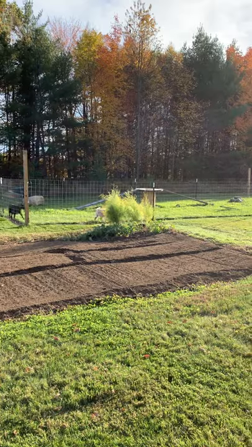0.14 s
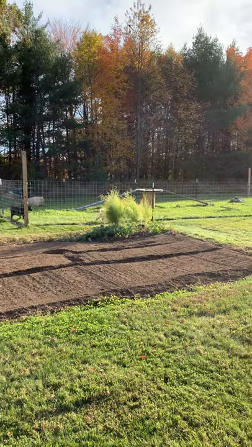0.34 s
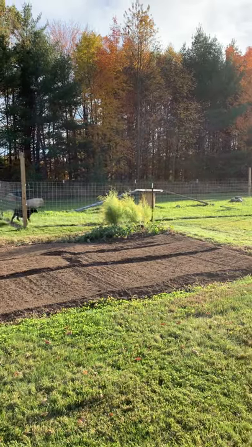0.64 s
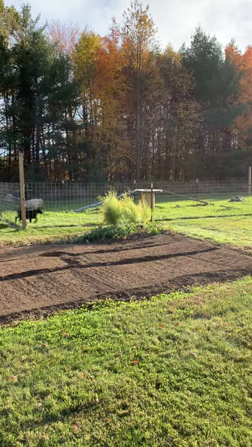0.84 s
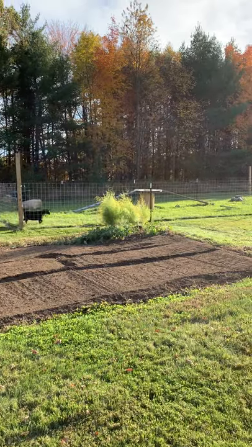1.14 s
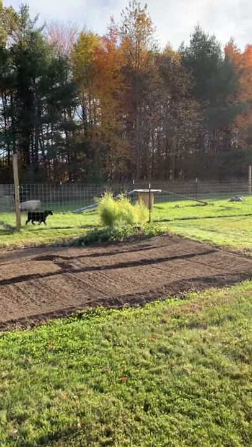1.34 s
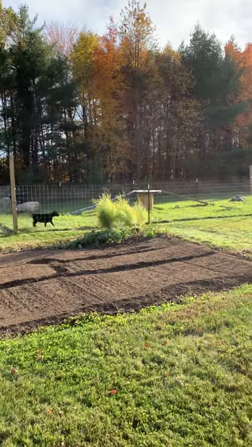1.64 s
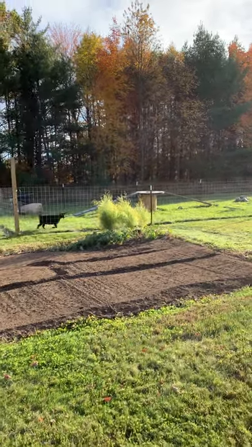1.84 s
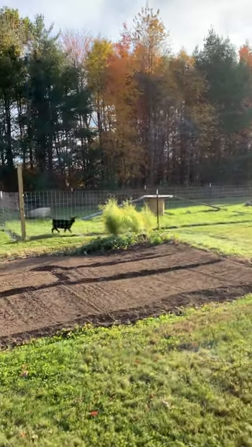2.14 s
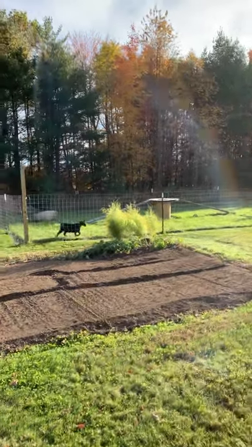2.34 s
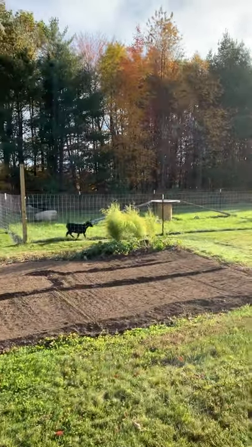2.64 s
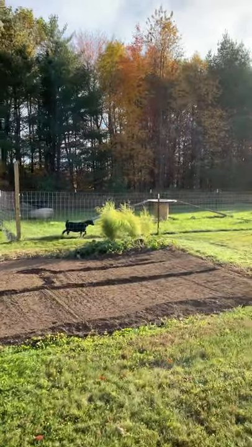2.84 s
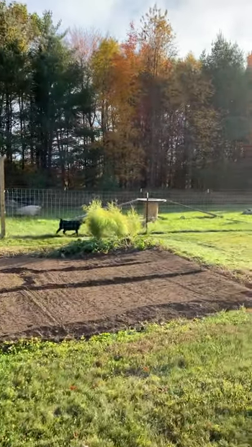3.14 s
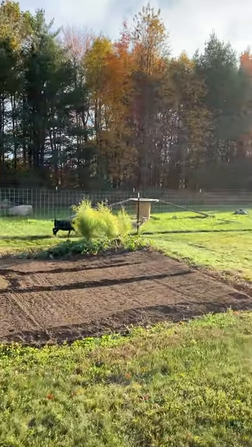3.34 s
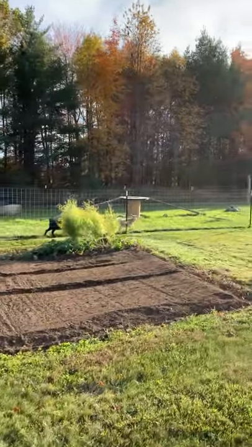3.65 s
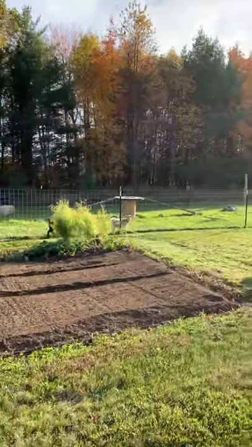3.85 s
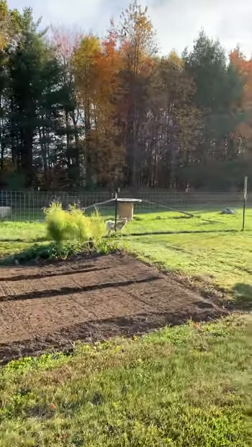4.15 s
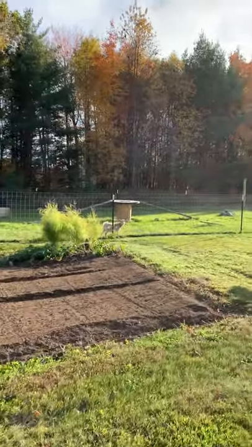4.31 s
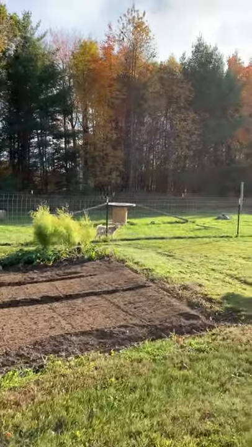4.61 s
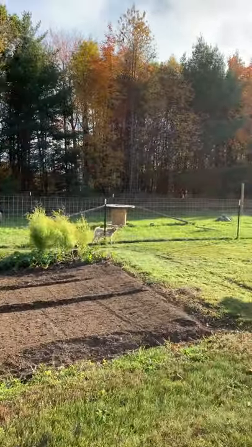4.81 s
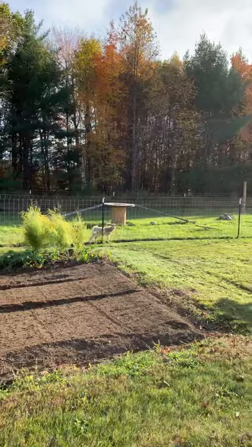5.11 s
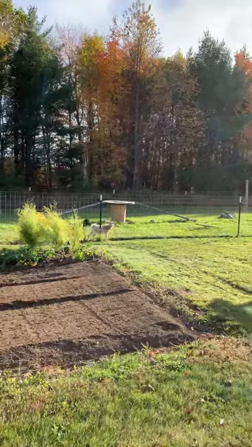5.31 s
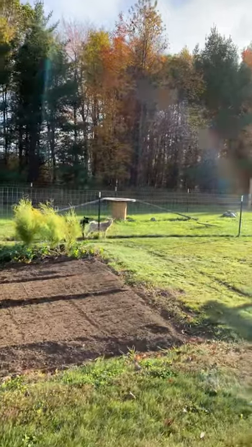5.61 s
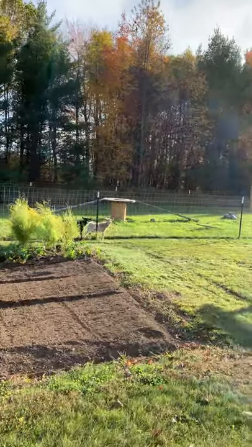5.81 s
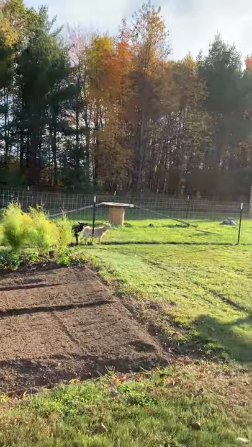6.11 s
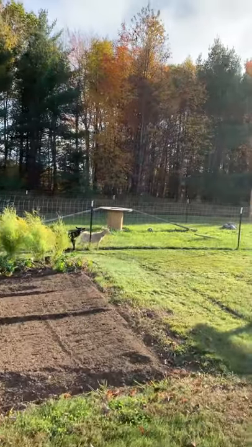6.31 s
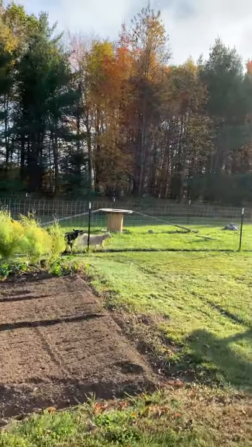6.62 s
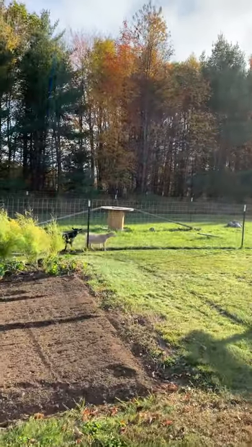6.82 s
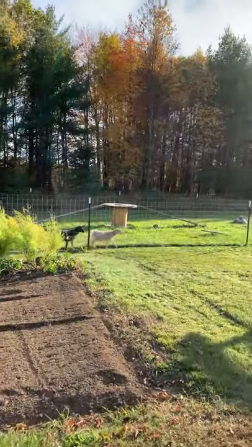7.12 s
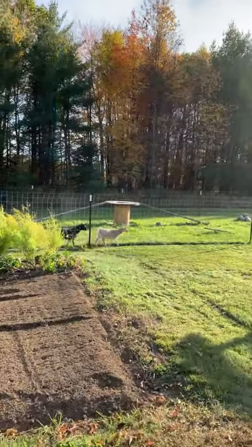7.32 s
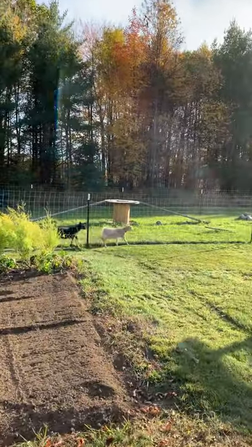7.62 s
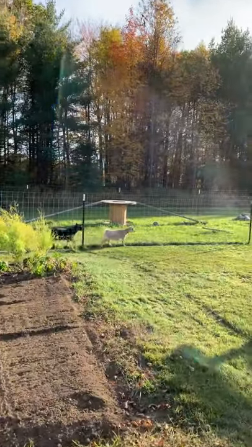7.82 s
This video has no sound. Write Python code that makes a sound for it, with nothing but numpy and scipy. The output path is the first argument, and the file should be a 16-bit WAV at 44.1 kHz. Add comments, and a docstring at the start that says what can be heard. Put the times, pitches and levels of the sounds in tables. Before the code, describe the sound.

Two young goats call at mid-distance, almost in unison, in three bursts separated by pauses of over a second. One voice is strained, sliding down and breaking; the other stutters brightly above it. Crickets trill in the gaps, growing louder, with soft rustles and brittle grass ticks close to the handheld microphone. Light open-air echo, quiet insect hiss and low distant hum.

```python
"""Two young goats bleat over each other across a pasture: one holds long cries that break into half pitch,
the other stutters. A nearby wall and a tree line send back echoes; crickets chirp, trill and buzz, insects
hiss, grass snaps and rustles near the microphone, far traffic hums. Goat voices are pulses and breath through
resonances; crickets are short gliding tones; grass, leaves, hiss and hum are shaped noise."""
import sys
import numpy as np
from scipy import signal
from scipy.fft import rfft, irfft, next_fast_len
from scipy.io import wavfile
from scipy.ndimage import uniform_filter1d, map_coordinates

SR = 44100
rng = np.random.default_rng(int(sys.argv[2]) if len(sys.argv) > 2 else 0)


def voltage_ratio(level):
    """Linear amplitude factor for a level in decibels (scalar or array-like)."""
    return 10 ** (np.asarray(level, float) / 20)


def inscribe(sig):
    """Save sig as 16-bit PCM at rate SR to the path in sys.argv[1].

    A 1-D sig is mono; a 2-D sig holds one channel per row.
    Samples are clipped to [-1, 1] before scaling.
    """
    pcm = np.round(np.clip(np.atleast_2d(sig).T, -1, 1) * 32767)
    wavfile.write(sys.argv[1], SR, pcm.astype(np.int16))


N = 351036

# long cries, course of each: t/s, pitch/Hz, relative effort/dB, upper mouth resonance f/Hz, breath (0-1),
# half pitch (0-1), second resonance level/dB, treble slope/(dB per octave)
CRY_COURSES = [
    [(0, 393, -33.5, 6600, 0.8, 0.36, -2, -5.5), (.04, 392.7, -30.5, 6600, .08, 0.3, -1.5, -7.5),
     (.09, 390.9, -35, 6600, 0, 0.42, 1, -7.5), (.165, 383, -38, 6830, 0.45, 0.65, -4, -7),
     (.19, 376.2, -38.5, 6860, 0.54, 0.4, 2, -3), (.26, 387.4, -52, 6850, 0.83, 0.2, 4, -5)],
    [(1.335, 354, -69, 4450, 0, 0, -3, 0.5), (1.36, 384, -48, 4700, .15, 0, -3, 2.5),
     (1.4, 437, -35, 5600, 0.2, 0, 0, 0), (1.44, 468.3, -31.5, 5600, .03, 0, -6, -1),
     (1.5, 457.2, -33, 5260, 0, 0.02, -3.5, 1), (1.56, 451.5, -35, 5100, 0.1, 0.02, 3, 2),
     (1.63, 431, -35, 4970, 0.21, .1, -1, 3), (1.7, 408.8, -36.5, 5013, 0.24, 0.13, 6, 1),
     (1.85, 396, -36, 6000, 0.45, 0.36, 5.5, -1), (2.0, 387.6, -38.5, 6330, 0.37, 0.66, -0.5, 3),
     (2.13, 381.8, -42, 6560, 0.41, 0.47, -5, 4), (2.22, 393, -39, 6650, 0.32, 0.25, -1.5, 4.5),
     (2.27, 382.6, -39, 6810, 0.9, 0, 4.5, 5), (2.31, 360, -88, 6500, 0.9, .3, 0, 2)],
    [(3.875, 396, -66, 5130, 0.5, 0, 0, -2), (3.915, 461.5, -35, 5700, 0.1, 0, 4, 3),
     (3.99, 483.7, -30, 5700, 0.18, 0.07, -4.5, 2.5), (4.12, 469.3, -32.5, 5320, 0.04, 0.08, 2.5, 5.5),
     (4.22, 443.6, -33.5, 5060, 0.17, 0.05, 3, 8.5), (4.32, 414, -31, 5960, 0.38, 0.13, 5, 6),
     (4.45, 408.4, -33.5, 6280, 0.4, 0.05, 6.5, 6), (4.58, 403.9, -35.5, 6600, 0.54, 0.4, 5.5, 6),
     (4.7, 388.1, -36, 7000, 0.4, 0.86, 3.5, 2.5), (4.795, 375.8, -32.5, 6800, 0.39, 0.8, 0, 1),
     (4.815, 398.8, -32, 6560, 0, 0.12, -3.5, 1.5), (4.865, 387.8, -32.5, 6700, 0.2, 0, -7, 3),
     (4.89, 385.3, -38.5, 6600, 0.6, 0.33, -3, 3), (4.92, 363, -75, 6650, 0.54, .3, 4, -3)],
    [(6.36, 392, -43, 5300, 0.4, 0.1, 2, 1), (6.41, 433.7, -31.5, 6200, 0.3, 0, -1, -0.5),
     (6.47, 457.3, -30.5, 6640, 0.15, 0.3, -4, -0.5), (6.53, 438.6, -32.5, 6400, 0.14, 0.1, -1, 0.5),
     (6.73, 411.3, -32, 7450, 0.11, 0, -1, 2), (6.9, 406, -31, 7620, 0.36, 0.31, -4, 1),
     (6.96, 401.7, -32, 7780, 0, 0, 3.5, -0.5), (7.02, 399.7, -30.5, 7990, 0.5, 0.04, -0.5, -0.5),
     (7.11, 389.3, -38, 8170, 0.36, 1, 4.5, 1), (7.2, 381.4, -35.5, 8200, 0.63, .9, -8, 0),
     (7.225, 390, -33, 8500, 0.43, .4, -1, -3.5), (7.3, 371.5, -35, 8000, 0.53, .4, -2.5, -1.5),
     (7.35, 346, -49, 8300, .9, 0.1, -1, 3)],
]
# stuttered bleats, one row a throb: t of the crest/s, crest pitch/Hz, relative effort/dB
BLEAT_THROBS = [
    [(1.588, 605.6, -46.5), (1.662, 600.8, -35.5), (1.738, 596.6, -31), (1.823, 582.3, -33.5),
     (1.907, 595.3, -30.5), (1.992, 551.7, -32.5), (2.08, 529, -30.5), (2.17, 497.5, -36),
     (2.255, 462.2, -49)],
    [(3.84, 601, -37), (3.916, 590.6, -30), (3.996, 585, -35), (4.077, 582, -35), (4.16, 557, -35.5),
     (4.245, 508, -35.5)],
    [(6.287, 569.5, -38), (6.361, 593, -31.5), (6.444, 588, -28.5), (6.521, 589, -31), (6.604, 585, -25.5),
     (6.685, 573, -30), (6.775, 535.5, -32.5), (6.865, 483.4, -32)],
]
# effort through one throb: share of the way to the next crest (0-1), level/dB
THROB_EFFORT = [(0, 1), (.06, -2), (.14, -9), (.3, -7), (.5, -13), (.68, -4), (.82, -1), (1, -1.5)]
# fixed throat resonances, each passed twice: f/Hz, width/Hz, level per pass/dB
CRY_THROAT_MODES = [(406, 110, -11.5), (1197, 289, 2), (2525, 514, -1), (4080, 877, -3), (4665, 1170, 0.5),
                    (5388, 2400, -3.5), (8980, 2000, -4), (12870, 10500, -14.5)]
BLEAT_THROAT_MODES = [(550, 340, -12.5), (1191, 208, 2), (2609, 410, -2), (3478, 530, -2.5),
                      (4460, 2020, -4.5), (6400, 1380, -2), (9450, 5000, -6)]
# decay of the tree echo: f/Hz, time to fall 60 dB/s
TREE_DECAY = [(300, 0.4), (1200, 0.93), (3000, 0.7), (9000, 0.23)]
# grass snaps: t/s, tick level/dB, knock level/dB, knock f/Hz
GRASS_SNAPS = [(2.314, -68, -59.5, 486), (2.607, -59, -60.5, 302), (3.292, -56, -50, 1370),
               (3.351, -50, -53.5, 1500), (3.376, -48, -44, 1080), (3.427, -52, -46.5, 1250),
               (3.473, -45.5, -50, 1210), (3.515, -44, -53, 1300), (4.934, -78, -48, 626),
               (5.392, -80, -53.5, 189), (5.684, -47, -64, 1014), (6.041, -61.5, -54, 1510),
               (6.079, -43, -59, 1470), (6.11, -38, -73, 1520), (6.122, -47, -68, 1500),
               (6.234, -37.5, -59, 686), (7.398, -68.5, -49, 341), (7.879, -92, -56.5, 362),
               (7.921, -76, -56, 360)]
# trilling cricket, one row a stretch where the trill is heard between the calls:
# t of first note/s, t of last note/s, first level/dB, last level/dB
TRILL_STRETCHES = [(0.279, 1.266, -71, -67), (2.362, 3.796, -67, -57.5), (5, 6.0834, -54.5, -46)]
# chirping cricket: t of the last stroke/s, relative level/dB, strokes (count)
CHIRP_TIMES = [(0.418, -50.5, 3), (1.0136, -50, 3), (2.4856, -56, 3), (2.799, -56.5, 3), (3.264, -55, 2),
               (7.6339, -65, 3)]
# strokes of one chirp: t from the last stroke/s, relative level/dB, f/Hz
CHIRP_STROKES = [(-.08, -3, 5320), (-.042, 1.5, 5420), (0, 2, 5550)]
# steady cricket: t/s, level/dB
BUZZ_LEVEL = [(0, -61.5), (3, -64), (6.2, -83.5), (7.96, -91)]
# swells of leaves and grass, and at .3 s the tail of the first cry's echo:
# t of the centre/s, half width/s, level/dB
RUSTLE_AND_TAIL_SWELLS = [(.3, 0.075, -71.5), (.68, 0.037, -123.5), (1.16, 0.15, -59.5), (2.38, 0.095, -84),
                          (2.6, 0.037, -80), (3.0, 0.16, -61), (3.72, 0.2, -61.5), (5.15, 0.13, -65.5),
                          (5.45, .12, -87), (5.81, 0.1, -70), (6.03, 0.059, -59), (6.22, 0.044, -68.5),
                          (7.6, 0.073, -60.5)]
# flares of the insect hiss: t of the centre/s, half width/s, level/dB
HISS_FLARES = [(3.65, 0.092, -63), (6.08, 0.073, -56), (7.42, 0.03, -61)]
# level of the far hum: t/s, level/dB
HUM_COURSE = [(0, -65), (.29, -62.5), (.7, -78), (1.1, -69.5), (2, -74.5), (2.35, -69), (2.9, -72.5),
              (3.37, -64), (3.77, -71.5), (4.05, -65.5), (6.3, -65), (6.6, -70), (7.25, -60.5),
              (7.58, -71.5), (7.96, -60.5)]
# noise spectra: f/Hz, relative density/(dB per Hz)
RUSTLE_SPECTRUM = [(120, -21.5), (300, 0), (600, -0.5), (1200, 3), (2500, -0.5), (3600, -10), (6000, -25)]
HISS_SPECTRUM = [(2500, -19), (3900, 7), (4600, 5), (5300, 0.5), (6300, -6.5), (6900, 2.5), (7500, -7),
                 (8700, -1), (9300, -12), (12000, -13), (16000, -24)]
HUM_SPECTRUM = [(15, -45.5), (25, -21), (59, -0.5), (75, 7), (89, -0.5), (106, 6), (135, -4), (165, -7.5),
                (195, -4), (230, -12), (330, -16.5), (430, -24.5), (730, -120)]
# phase of the left channel against the right's, climbing with frequency and holding level in places: f/Hz,
# phase/rad
STEREO_PHASE = [(0, 0), (1290, -0.4), (1720, 0.1), (2410, 1.5), (3190, 1.2), (3790, 1.8), (4310, 2.8),
                (5080, 3.5), (6120, 5.5), (6370, 6.2), (7490, 6.4), (7750, 7.7), (8350, 9.0), (9560, 9.9),
                (10400, 12.3), (11600, 12.6), (12200, 14.3), (12500, 15.6), (13700, 15.7), (14600, 18.8),
                (15800, 18.9)]

PITCH_DIP = 0.17  # share of the pitch lost between throbs
MOUTH_START_HZ, MOUTH_RISE_HZ_PER_S = 3840, 2530  # the mouth widens through a bleat
BRIGHT_PER_DB, NEUTRAL_DB = 0.6, -30  # more effort, more treble
NOTE_GAP_S = 0.0572  # between trill notes
RUSTLE_FLOOR_DB, HISS_FLOOR_DB = -69, -70.5  # between swells and flares


def unit(x):
    """Scale to rms 1."""
    return x / np.sqrt(np.mean(x ** 2) + 1e-20)


def along(points, hz):
    """Read (f/Hz, value) points on a log frequency axis."""
    f, v = np.transpose(points)
    return np.interp(np.log(hz + 1), np.log(f + 1), v)


def curves(rows, t):
    """Read each column after the first at the positions t."""
    s, *cols = np.transpose(rows)
    return [np.interp(t, s, c) for c in cols]


def wobble(n, rate):
    """Draw a smooth random curve with rate knots a second."""
    knots = rng.standard_normal(int(n * rate / SR) + 4)
    return map_coordinates(knots, [np.arange(n) * rate / SR])


def filtered(x, response):
    """Multiply the spectrum of x by a complex response of frequency."""
    m = next_fast_len(x.shape[-1] + 8192)
    spectrum = rfft(x, m) * response(np.fft.rfftfreq(m, 1 / SR))
    return irfft(spectrum, m)[..., :x.shape[-1]]


def peak(f, hz, width_hz):
    """One causal resonance."""
    return 1j * f * width_hz / (hz * hz - f * f + 1j * f * width_hz)


def add(x, s, piece):
    """Mix a piece into x at time s."""
    room = x[round(s * SR):][:len(piece)]
    room += piece[:len(room)]


def voice(pitch_hz, effort_db, half, breath, bright_db, ring_db, mouth_hz, throat, low_hz, high_hz,
          mouth_db, notch, jitter):
    """Vocal-fold pulses and breath through a moving mouth resonance and the fixed throat."""
    n = len(pitch_hz)
    # a breathier voice is less steady
    unsteady = jitter * wobble(n, 40) + 0.011 * breath * wobble(n, 300)
    phase = 2 * np.pi * np.cumsum(pitch_hz * (1 + unsteady)) / SR
    # a geometric sum gives equal harmonics up to top
    top = np.floor(SR * 0.4 / pitch_hz.max())
    turn = np.exp(1j * phase)
    pulses = unit(np.real(turn * (1 - turn ** top) / (1 - turn + 1e-9)))
    # every other pulse weaker: lines halfway between the harmonics
    pulses = pulses * (1 + np.clip(half, 0, 1) * np.cos(phase / 2))
    uneven_db = (0.83 + 3.54 * breath) * wobble(n, 58.5) + 0.84 * breath * wobble(n, 250)
    pulses = pulses * voltage_ratio(uneven_db)
    puffs = unit(rng.standard_normal(n) * (1 + 0.2 * np.cos(phase)))  # breath puffs once a cycle

    f, t, z = signal.stft([pulses, puffs], SR, nperseg=256)
    f = f[:, None]
    frame_samples = np.minimum((t * SR).astype(int), n - 1)
    at = lambda curve: curve[frame_samples]
    # the treble is breathier
    share = np.clip(at(breath) * (1 + f / 9000) + (f / 26000) ** 2, 0, 1)
    mixed = np.sqrt(1 - share ** 2) * z[0] + share * z[1]
    mouth = 1 + voltage_ratio(mouth_db) * abs(peak(f, at(mouth_hz), 538))
    # a side pocket swallows a band just above
    pocket = 1 - np.clip(notch, 0, 1) * abs(peak(f, 1.088 * at(mouth_hz), 500)) ** 2
    tilt = voltage_ratio(at(bright_db) * np.log2(np.maximum(f / 2500, 1)))
    ring = voltage_ratio(at(ring_db) * abs(peak(f, 2700, 560)) ** 2)
    shaped = mixed * mouth * pocket * tilt * ring
    source = signal.istft(shaped, SR, nperseg=256)[1][:n] * voltage_ratio(effort_db)

    # neighbouring throat resonances alternate in sign
    tube = lambda f: sum((-1) ** k * voltage_ratio(db) * peak(f, hz, w) for k, (hz, w, db) in enumerate(throat))
    edges = lambda f: (1j * f / (low_hz + 1j * f)) ** 3 * (high_hz / (high_hz + 1j * f)) ** 3
    return filtered(np.pad(source, (0, 900)), lambda f: tube(f) ** 2 * edges(f))


def crying_goat():
    """Long cries: weakening every other fold pulse breaks the voice into half pitch."""
    out = np.zeros(N)
    for rows in CRY_COURSES:
        t = np.arange(rows[0][0], rows[-1][0], 1 / SR)
        pitch_hz, effort_db, mouth_hz, breath, half, ring_db, bright_db = curves(rows, t)
        cry = voice(pitch_hz, effort_db, half, breath, bright_db, ring_db, mouth_hz, CRY_THROAT_MODES,
                    low_hz=820, high_hz=10200, mouth_db=14.0, notch=0.62, jitter=0.0014)
        add(out, t[0], voltage_ratio(14.0) * cry)
    return out


def stuttering_goat(fall=0.3, taut=0.88, lead_in_s=0.045):
    """Each throb climbs in pitch and effort to a crest, then drops quickly."""
    out = np.zeros(N)
    for rows in BLEAT_THROBS:
        crests = np.array(rows)[:, 0]
        t = np.arange(crests[0] - lead_in_s, crests[-1] + 0.046, 1 / SR)
        knots = np.r_[crests[0] - 0.08, crests, crests[-1] + 0.08]
        cycle = np.interp(t, knots, np.arange(len(knots))) % 1  # 0 at each crest
        # the folds are slackest at fall, nearly tight again at taut
        slack = np.sin(np.pi * np.interp(cycle, [0, fall, taut, 1], [0.0075, 0.5, 0.96, 1])) ** 2
        crest_hz, effort_db = curves(rows, t)
        pitch_hz = crest_hz * (1 - PITCH_DIP * slack)
        bright_db = BRIGHT_PER_DB * (effort_db - NEUTRAL_DB)
        mouth_hz = MOUTH_START_HZ + MOUTH_RISE_HZ_PER_S * (t - t[0])
        fade = np.clip(np.minimum(t - t[0], t[-1] - t) / 0.049, 1e-3, 1)
        level_db = effort_db + curves(THROB_EFFORT, cycle)[0] + 20 * np.log10(fade)
        hoarse = 0.07 + 0.3 * slack
        bleat = voice(pitch_hz, level_db, 0 * t, hoarse, bright_db, 0 * t, mouth_hz, BLEAT_THROAT_MODES,
                      low_hz=215, high_hz=5870, mouth_db=21.5, notch=0.08, jitter=0.0019)
        add(out, t[0], voltage_ratio(16.5) * bleat)
    return out


def wall_echo(x, delay_s=0.036):
    """One hard wall nearby returns a single duller slap."""
    late = np.pad(x, (int(delay_s * SR), 0))[:N]
    return filtered(late, lambda f: 5000 / (5000 + 1j * f))


def tree_echo(x, delay_s=0.027, alike=0.86):
    """The tree line answers with a noise tail whose decay time depends on frequency."""
    hz, t, z = signal.stft(rng.standard_normal((3, SR)), SR, nperseg=256)
    decay = voltage_ratio(-60 * t / along(TREE_DECAY, hz)[:, None])
    tail = signal.istft(z * decay, SR, nperseg=256)[1]
    # one tail shared by both channels, and one of each channel's own
    tail = alike * tail[:1] + (1 - alike) * tail[1:]
    late = np.pad(x, (int(delay_s * SR), 0))[None]
    return signal.fftconvolve(late, tail / np.linalg.norm(tail[0]), axes=1)[:, :N]


def grass():
    """Dry stalks snap near the microphone: a bright noise tick and a dull resonant knock."""
    out, t = np.zeros(N), np.arange(SR // 4) / SR
    for s, tick_db, knock_db, hz in GRASS_SNAPS:
        tick, knock = rng.standard_normal((2, len(t)))
        tick = filtered(tick * voltage_ratio(-60 * t / 0.006), lambda f: peak(f, 6000, 9000))
        knock = unit(filtered(knock, lambda f: peak(f, hz, 0.94 * hz) ** 2))
        # a lower knock starts and dies more slowly
        knock = knock * voltage_ratio(-60 * t / (0.034 + 40 / hz)) * (1 - np.exp(-t * hz / 3))
        add(out, s, voltage_ratio(tick_db) * tick + voltage_ratio(knock_db) * knock)
    return out


def wing_notes(s, db, hz, life_s, arch_hz, fall_hz, skew):
    """Wing strokes: short tones whose pitch arches and sags."""
    out, u = np.zeros(N), np.linspace(0, 1, int(life_s * SR))
    shape = np.sin(np.pi * u ** skew) ** 0.64
    scattered_hz = hz * rng.normal(1, 0.0045, len(s))
    for mark, level_db, note_hz in np.broadcast(s, db, scattered_hz):
        pitch = note_hz + arch_hz * np.sin(np.pi * u) - fall_hz * u ** 3
        tone = np.sin(2 * np.pi * np.cumsum(pitch) / SR)
        add(out, mark - 0.004, voltage_ratio(level_db) * shape * tone)  # the note starts 4 ms before its mark
    return out


def trilling_cricket(scatter_s=0.0015, scatter_db=1):
    """Almost evenly spaced wing notes, heard between the calls; the level rises through each stretch."""
    stretches = []
    for s0, s1, db0, db1 in TRILL_STRETCHES:
        count = round((s1 - s0) / NOTE_GAP_S) + 1
        stretches.append(np.linspace([s0, db0], [s1, db1], count))
    notes = np.concatenate(stretches)
    notes = notes + rng.standard_normal(notes.shape) * [scatter_s, scatter_db]
    return wing_notes(*notes.T, 7960, life_s=0.02, arch_hz=241, fall_hz=860, skew=0.71)


def chirping_cricket():
    """Every chirp ends in the same pattern of wing strokes."""
    strokes = []
    for s, db, count in CHIRP_TIMES:
        for lag, step_db, hz in CHIRP_STROKES[-count:]:
            strokes.append((s + lag, db + step_db, hz))
    return voltage_ratio(5) * wing_notes(*np.transpose(strokes), life_s=0.012, arch_hz=80, fall_hz=380, skew=0.45)


def steady_cricket(rate_hz=54, hz=4950, fall_hz=600, grit=1.9):
    """An unbroken series of gritty wing strokes, each falling in pitch."""
    cycle = np.cumsum(rate_hz * (1 + 0.046 * wobble(N, 17))) / SR % 1
    along_stroke = np.clip(cycle / 0.65, 0, 1)  # then a weak even tone to the next stroke
    stroke = 0.25 + np.sin(np.pi * along_stroke)
    stroke = stroke * voltage_ratio(3 * wobble(N, 40)) * (1 + grit * wobble(N, 700))
    tone = np.sin(2 * np.pi * np.cumsum(hz - fall_hz * along_stroke) / SR)
    return unit(stroke * tone) * voltage_ratio(curves(BUZZ_LEVEL, np.arange(N) / SR)[0])


def rush(spectrum, alike, patchy_db):
    """Stereo noise of rms 1 with patches of random gain; alike is the channels' correlation."""
    z = signal.stft(rng.standard_normal((2, N)), nperseg=512)[2]
    field = rng.standard_normal(z.shape[1:])
    field = uniform_filter1d(uniform_filter1d(field, 6, 0), 12, 1)
    patchy = signal.istft(z * voltage_ratio(patchy_db * unit(field)), nperseg=512)[1][:, :N]
    a, b = filtered(patchy, lambda f: voltage_ratio(along(spectrum, f)))
    turn = np.arccos(np.clip(alike, -1, 1)) / 2
    mid, side = np.cos(turn) * a, np.sin(turn) * b
    return unit(np.array([mid + side, mid - side]))


def swells(rows, floor_db):
    """A floor with bell-shaped swells on it, as gain."""
    t = np.arange(N) / SR
    return voltage_ratio(floor_db) + sum(voltage_ratio(db) * np.exp(-((t - s) / width) ** 2) for s, width, db in rows)


def rustle():
    """Patchy, wide noise swells as leaves and grass rustle, and at .3 s as the tail of the first cry's echo."""
    gain = swells(RUSTLE_AND_TAIL_SWELLS, RUSTLE_FLOOR_DB) * voltage_ratio(1.2 * wobble(N, 15))
    return gain * rush(RUSTLE_SPECTRUM, 0.14, patchy_db=3.5)


def insect_hiss():
    """Insects hiss as high, narrow-stereo noise that flares up."""
    gain = swells(HISS_FLARES, HISS_FLOOR_DB) * voltage_ratio(2.4 * wobble(N, 9.2))
    return gain * rush(HISS_SPECTRUM, 0.95, patchy_db=3)


def far_hum():
    """Far traffic hums as low noise of drifting level."""
    level_db = curves(HUM_COURSE, np.arange(N) / SR)[0] + 1.3 * wobble(N, 55)
    return voltage_ratio(level_db) * rush(HUM_SPECTRUM, 0.91, patchy_db=-1.0)


def scene():
    """Goats with their echoes, grass, crickets and the background."""
    goats = crying_goat() + stuttering_goat()
    echoes = voltage_ratio(-8.5) * wall_echo(goats) + voltage_ratio(-20.5) * tree_echo(goats)
    crickets = trilling_cricket() + chirping_cricket() + steady_cricket()
    background = rustle() + insect_hiss() + far_hum()
    return goats + echoes + grass() + crickets + background


def band_limit(x):
    """A steep low-pass at the top of the band."""
    return signal.sosfilt(signal.butter(12, 15830, fs=SR, output="sos"), x)


def record(dry):
    """Stereo processing turns the left channel's phase against the right's, half of the angle on each."""
    hz, angle = np.transpose(STEREO_PHASE)
    turned = filtered(dry, lambda f: np.exp(1j * np.interp(f, hz, angle) / [[2], [-2]]))
    return band_limit(turned)


dry = scene()
out = record(dry)
inscribe(out)
```